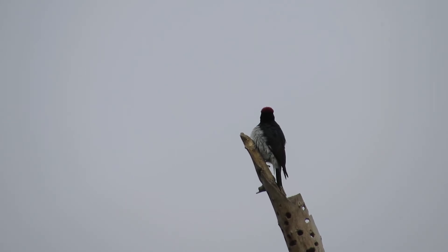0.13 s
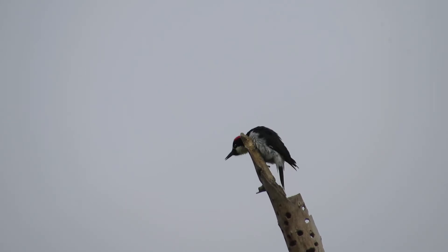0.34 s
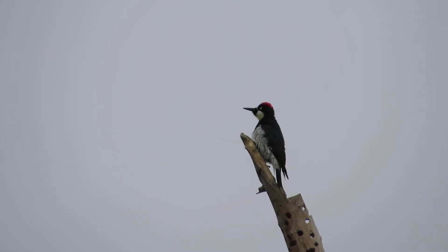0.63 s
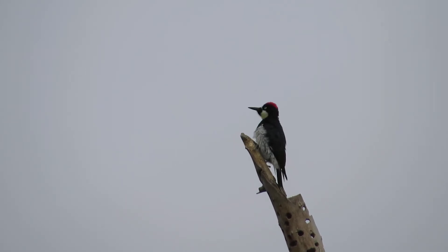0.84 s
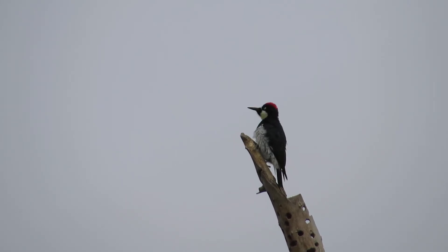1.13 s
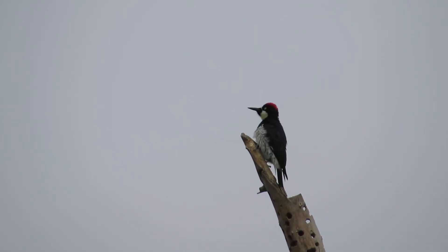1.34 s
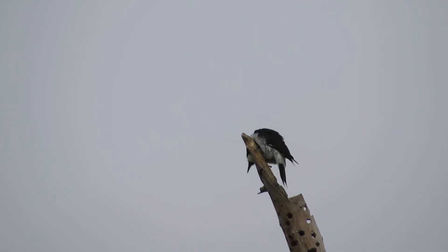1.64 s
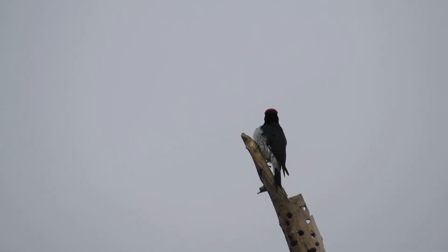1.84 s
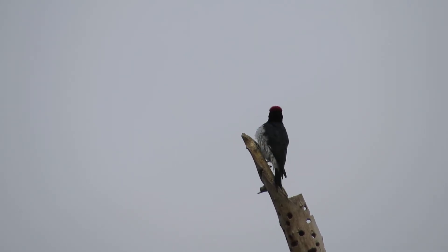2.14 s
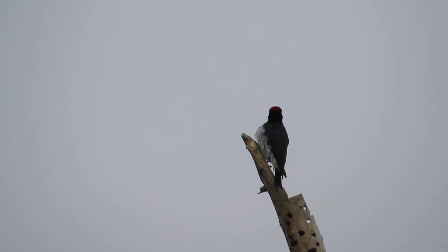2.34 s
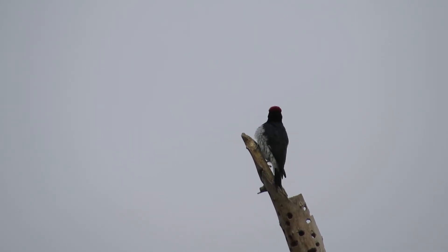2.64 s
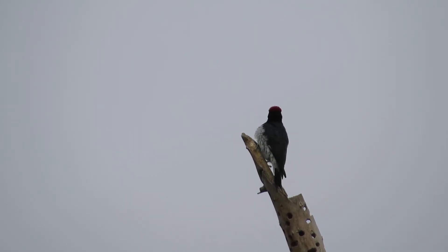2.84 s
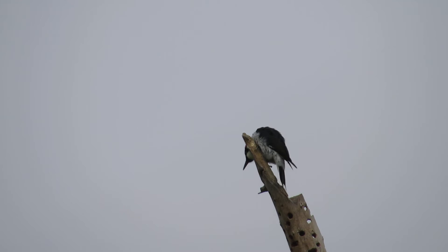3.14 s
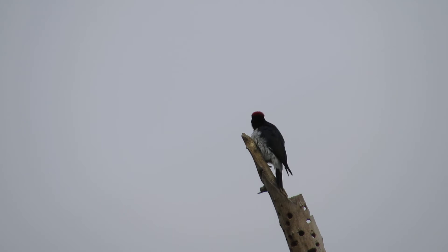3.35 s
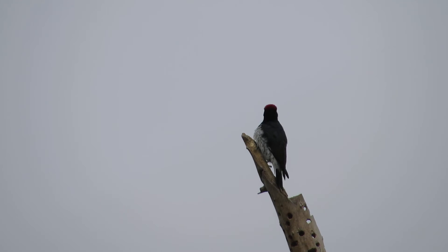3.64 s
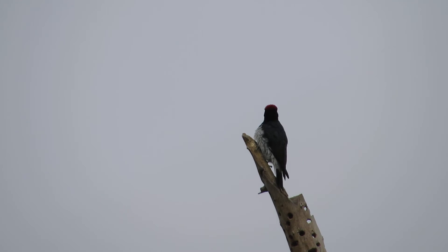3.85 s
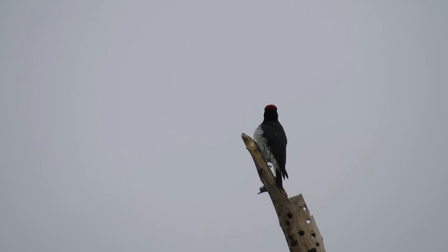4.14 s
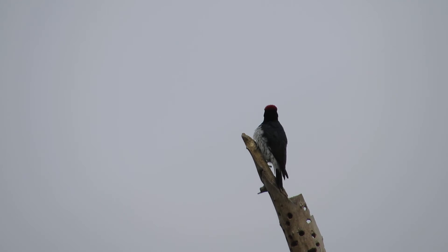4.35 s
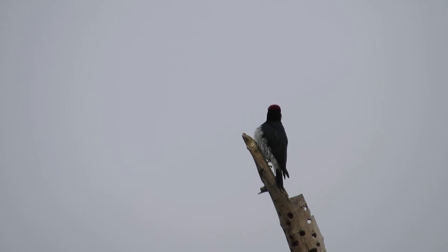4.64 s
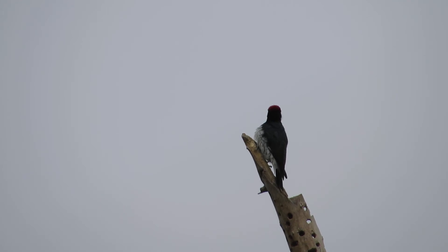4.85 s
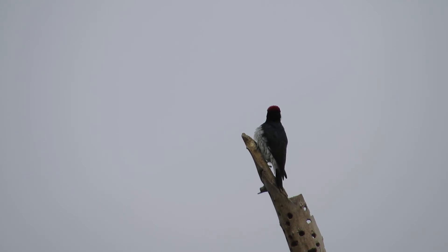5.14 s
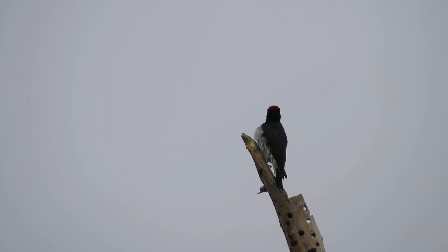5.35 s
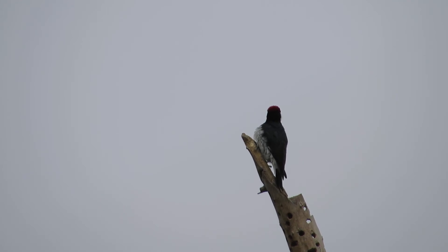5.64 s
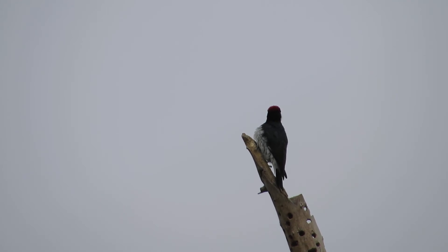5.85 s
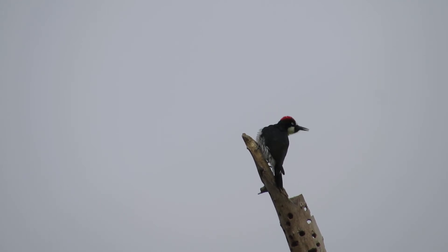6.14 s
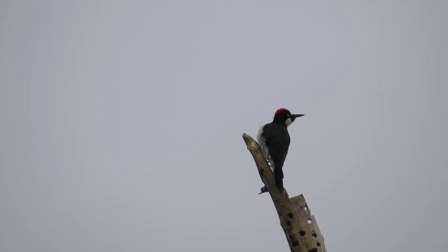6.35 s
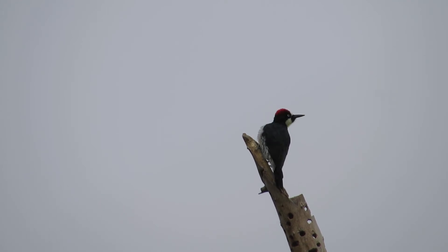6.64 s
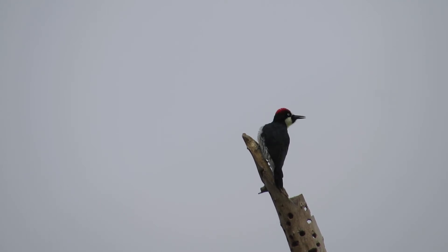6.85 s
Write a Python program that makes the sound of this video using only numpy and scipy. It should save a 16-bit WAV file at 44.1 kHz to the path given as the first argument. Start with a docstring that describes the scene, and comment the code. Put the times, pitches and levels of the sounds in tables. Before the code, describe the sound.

A woodpecker gives repeated rolling, raspy calls outdoors, early ones answered by shorter softer notes, over faint low rumble and distant thin bird whistles.

```python
"""Outdoors among trees, an acorn woodpecker on a dead branch gives six rolling calls,
the first three followed by a short, softer one. Each call is a run of pitch arches, about 36 a second,
shaped by throat and beak; most of the long calls turn raspy where they are highest.
A small bird further off whistles swept notes, an unsteady tone whines in the distance,
and filtered noise makes a low outdoor rumble and a soft hiss under it all."""
import sys
import numpy as np
from scipy import signal
from scipy.fft import rfft, irfft
from scipy.io import wavfile
from scipy.ndimage import uniform_filter1d

SR = 44100
rng = np.random.default_rng(int(sys.argv[2]) if len(sys.argv) > 2 else 0)


def dump_mix(stems):
    """Bounce the given channels to the path in sys.argv[1] as a 16-bit WAV at rate SR."""
    frames = np.atleast_2d(stems).T  # one column per channel
    limited = np.clip(frames, -1, 1)  # hard clip at full scale
    pcm = np.round(limited * 32767).astype(np.int16)
    wavfile.write(sys.argv[1], SR, pcm)


N = 308259
TIME = np.arange(N) / SR  # s
FREQS = np.fft.rfftfreq(N, 1 / SR) + 1e-3  # Hz, kept above zero so that a logarithm works
SYLLABLE_S = 0.028  # approximate spacing of the woodpecker's syllables

# resonances of the woodpecker's throat and beak, from low to high; the lowest three move with the call's pitch:
# [f/Hz, width/Hz, gain with the beak shut/dB, change with the beak wide open/dB, share of the weakening]
THROAT_RESONANCES = [(1890, 290, -27.5, -2, .3), (2620, 700, -23, -7, 1.7), (3385, 850, -34, 11, 1.43),
                     (4790, 2570, -44.5, 12.5, 0.82), (5860, 250, -33, -13.5, .6),
                     (11100, 2500, -54.5, 19, .3)]


def undb(db):
    """Turn decibels into a gain."""
    return 10 ** (np.asarray(db) / 20)


def unit(x):
    """Scale to an rms of 1."""
    return x / np.sqrt(np.mean(x ** 2))


def resonate(x, hz, width):
    """Ring at one pitch; the resonance is applied twice, for steep skirts."""
    b, a = signal.iirpeak(hz, hz / width, fs=SR)
    once = signal.lfilter(b, a, x)
    return signal.lfilter(b, a, once)


def band(hz, width):
    """Noise around one pitch, rms 1."""
    return unit(resonate(rng.standard_normal(N), hz, width))


def walk(hz):
    """Smooth random movement, up to about hz times a second, rms 1."""
    spectrum = rfft(rng.standard_normal(N))
    return unit(irfft(spectrum / (1 + (FREQS / hz) ** 4), N))


def air(flicker_db=1.0, left_db=0.1):
    """Rumble and hiss from shaped noise; the low part breathes a little and swells now and then."""
    # loudness of rumble and hiss along the pitch range, before the breathing:
    # [f/Hz, part alike at both ears/dB per Hz, part opposed between the ears/dB per Hz]
    noise_curve = [(20.1, -78, -83.5), (47.7, -72, -73.5), (92, -67, -70), (133.7, -72, -74),
                   (200, -79, -71), (540, -84.5, -76), (853, -83.5, -79.5), (1185, -86.5, -85),
                   (2000, -91.5, -89.5), (3020, -93.5, -93), (6930, -99.5, -98.5), (9900, -103, -102.5),
                   (12650, -107, -108), (13550, -117, -117)]
    # narrow humps on that curve: [f/Hz, width/Hz, lift of the alike part/dB, lift of the opposed part/dB]
    curve_humps = [(553, 25, 4, 3.5), (736, 20, 6.5, 8.5), (984, 84, 6, 3.5), (7830, 1600, 3, 0.5),
                   (13170, 700, 8, 5)]
    # swells of low rumble: [t of the peak/s, time to rise or fade/s, f/Hz, width of each filter pass/Hz,
    # level at the peak/dB]
    rumble_swells = [(6.088, 0.068, 28.6, 27.5, -37), (6.2, 0.6, 80.6, 93.8, -45.5),
                     (6.26, 0.4, 323, 115.6, -52), (6.749, 0.33, 356.3, 150.8, -56.5)]
    curve_hz, *curve_levels = np.transpose(noise_curve)
    parts = []
    for way, level_db in enumerate(curve_levels):
        db = np.interp(np.log(FREQS), np.log(curve_hz), level_db)
        for hz, width, *lift in curve_humps:
            db = db + lift[way] * 2 ** -((2 * (FREQS - hz) / width) ** 2)
        noise = rfft(rng.standard_normal(N)) * undb(db) * np.sqrt(SR / 2)
        low_share = 1 / (1 + (FREQS / 1200) ** 4)
        rumble = irfft(noise * low_share, N) * undb(flicker_db * walk(4.1))
        hiss = irfft(noise * (1 - low_share), N)
        parts.append(rumble + hiss)
    alike, opposed = parts
    out = np.array([alike + opposed, alike - opposed])
    for s, length, hz, width, db in rumble_swells:
        rise_and_fall = np.exp(-((TIME - s) / length) ** 2)
        # separate noise for each ear
        out = out + undb(db) * rise_and_fall * np.array([band(hz, width), band(hz, width)])
    return out * undb(np.array([[left_db], [-left_db]]) / 2)


def sizzle(hz=8340, drift_hz=70, spread_hz=150, db=-71):
    """A narrow band of high hiss whose pitch wanders slowly, the same at both ears."""
    phase = 2 * np.pi * np.cumsum(hz + drift_hz * walk(1.4)) / SR
    return undb(db) * unit(walk(spread_hz) * np.sin(phase) + walk(spread_hz) * np.cos(phase))


def whine(waver_hz=7, flutter_db=2, fade_s=0.12):
    """A thin tone from far away that comes and goes; its pitch and loudness waver at random."""
    # stretches of whine: [start t/s, end t/s, middle f/Hz, level before the flutter/dB]
    whine_stretches = [(0, 1.5, 1439, -58.5), (2.05, 4.27, 1442, -59.5), (5.8, 6.4, 1456, -61.5)]
    out = 0
    waver = waver_hz * walk(23.0)
    for start, end, hz, db in whine_stretches:
        fade = np.clip(np.minimum(TIME - start, end - TIME) / fade_s, 0, 1)
        phase = 2 * np.pi * np.cumsum(hz + waver) / SR
        ear_shift = np.array([[.8], [0]])  # radians, left and right
        out = out + undb(db) * np.sqrt(2 * fade) * np.sin(phase + ear_shift)
    return out * undb(flutter_db * walk(27))


def syllables(wind_up=0.04, crest_power=2.2, opening_power=1.2, full_voice_hz=850, soft_db_per_hz=0.01,
              rasp_from_hz=870, rasp_full_hz=987, calm_rough=0.15, edge_rough=0.12):
    """Each call climbs to its highest pitch and sinks again while the beak opens; strength and rasp follow pitch.
    Rows: (t/s, top f/Hz, roughness, gain of each resonance/dB)."""
    # woodpecker calls: [t of first syllable/s, t of last syllable/s, first f/Hz, highest f/Hz, last f/Hz,
    # added rasp 0-1, relative level/dB, extra on the first syllable/dB, beak opening at the start 0-1,
    # brightness/dB, hiss of the top resonance/dB]
    calls = [(0.269, 0.467, 718, 993, 748, 0.25, -0.5, -2.5, 0.06, 0, 3),
             (0.636, 0.688, 630, 824.4, 763, .05, 0, -5.5, .8, -2, 0.5),
             (1.566, 1.738, 734, 999.3, 844, 0.32, -2, -1, 0, -2, 1.5),
             (1.9, 1.987, 620, 793, 645, .05, -1.5, -3, 0.66, -1, -8),
             (3.067, 3.271, 723, 1004, 791, 0.4, -1.5, -2.5, 0, -0.5, 3),
             (3.434, 3.521, 620, 786, 634, .05, -1.5, -5.5, 0.7, -0.5, -1),
             (4.57, 4.75, 700, 951, 791.5, 0.03, 1, -2.5, 0.09, 1, -12),
             (6.021, 6.221, 700, 989, 660, 0.31, -0.5, -2.5, 0.12, 1, 3.5),
             (6.848, 7.058, 660, 883, 699, 0, 2, -3, 0.43, 1.5, -0.5)]
    rows = []
    shut_db, open_db, weakening = np.transpose(THROAT_RESONANCES)[2:]
    for first, last, first_hz, high_hz, last_hz, rasp, db, first_db, ajar, bright_db, hiss_db in calls:
        length = last - first
        wait = wind_up * length  # extra pause after the first syllable
        times = np.linspace(first + wait, last, round((length - wait) / SYLLABLE_S) + 1)
        colour_db = np.array([-bright_db, 0, bright_db, hiss_db / 4, 0, hiss_db])
        for s in [first, *times[1:]]:
            progress = (s - first) / length
            edge_hz = first_hz if progress < .5 else last_hz
            # a higher power keeps the pitch flatter in the middle of a call
            hz = high_hz - (high_hz - edge_hz) * abs(2 * progress - 1) ** crest_power
            rough = calm_rough + rasp * np.interp(hz, [rasp_from_hz, rasp_full_hz], [0, 1])
            rough += edge_rough * (s in (first, last))  # slack first and last syllables
            # the beak opens slowly at first
            opening = ajar + (1 - ajar) * progress ** opening_power
            # below full_voice_hz the voice weakens
            soft_db = weakening * soft_db_per_hz * max(full_voice_hz - hz, 0)
            strength_db = db + first_db * (s == first) - soft_db
            rows.append((s, hz, rough, *(strength_db + colour_db + shut_db + open_db * opening)))
    return rows


def syrinx(pitch, rough, slope=1.0):
    """Membrane tone with 14 harmonics; when forced, its cycles turn uneven and alternate strong and weak."""
    uneven_pitch = pitch * (1 + .055 * rough * walk(500))
    phase = 2 * np.pi * np.cumsum(uneven_pitch) / SR
    tone = unit(sum(np.sin(k * phase) / k ** slope for k in np.arange(1, 15)))
    # half the pitch makes every other cycle stronger
    return tone * (1 + rough * (.7 * np.cos(phase / 2) + .45 * walk(500)))


def woodpecker(half_s=0.016, dip=.21, arch_power=1.15, lean=.1, sag=0.5, linked=0.58, fade_s=0.003, hold=1.01,
               fundamental_db=-26, breath=0.019, tracking=0.11, patchy_db=5, stagger=0.03443, top_air=.11):
    """Every syllable is one arch of pitch and loudness, coloured by throat and beak."""
    # narrow gaps between the resonances: [f/Hz, width/Hz, depth 0-1]
    throat_gaps = [(2120, 180, 0.14), (2820, 220, 0.27)]
    rows = syllables()
    times, tops, roughs = np.transpose(rows)[:3]
    centres = times - lean * half_s
    # the nearest syllable, looked up every 16 samples
    nearest = np.argmin(abs(TIME[::16, None] - centres), axis=1).repeat(16)[:N]
    place = np.clip((TIME - centres[nearest]) / half_s, -1, 1)

    # 0 at the top of an arch, towards 1 at its edges; the arch climbs slowly and falls fast
    slack = abs(np.sin(np.pi / 2 * (place - lean * (1 - place ** 2)))) ** (2 * arch_power)
    syllable_rough = np.clip(roughs[nearest], 0, 1)
    rasp = uniform_filter1d(syllable_rough, size=300)
    arches = uniform_filter1d(tops[nearest] * (1 - dip * slack), size=90)
    pitch = arches * (1 + stagger * rasp * walk(59.2))
    # the tone breaks up on the way to the top of an arch and clears partly as it falls
    rough = syllable_rough * (1.25 - slack) * np.interp(place, [.1, .6], [1, .45])

    # soft, low syllables stand apart; high ones run together
    effort = np.clip((np.interp(TIME, times, tops) - 800) / 150, 0, 1)
    swell = 1 - sag * (1 - linked * effort) * slack
    tone = syrinx(pitch, rough)
    air_flow = rng.standard_normal(N)
    voice = (tone + breath * air_flow) * swell
    # forced syllables turn noisy in the second and third resonance
    bright = voice + 1.7 * rough * swell * rng.standard_normal(N)
    # the top three resonances carry more air
    airy = (tone + top_air * air_flow) * swell
    # in a rasp the strength jumps about between the lowest three resonances
    sources = [source * undb(patchy_db * rasp * walk(37)) for source in (voice, bright, bright)]
    sources += [airy, airy, airy, voice]

    out = np.zeros(N)
    # a syllable lasts until the next one of its call
    waits = np.diff(times, append=np.inf)
    reaches = hold * np.where(waits < 2 * SYLLABLE_S, waits, SYLLABLE_S) / 2
    for centre, reach, (_, top, _, *levels) in zip(centres, reaches, rows):
        span = slice(int((centre - 2 * half_s) * SR), int((centre + 2 * half_s) * SR))
        gate = np.clip((reach - abs(TIME[span] - centre)) / fade_s + .5, 0, 1)
        # the throat tightens with pitch
        tighten = (top / 900) ** tracking
        throat = [(hz * tighten, width) for hz, width, *_ in THROAT_RESONANCES[:3]]
        throat += [(hz, width) for hz, width, *_ in THROAT_RESONANCES[3:]]
        # the fundamental barely gets out
        throat.append((top, top / 2))
        levels.append(levels[0] + fundamental_db)
        for source, (hz, width), db in zip(sources, throat, levels):
            out[span] += undb(db) * resonate(source[span], hz, width) * gate
    for hz, width, depth in throat_gaps:
        b, a = signal.iirpeak(hz, hz / width, fs=SR)
        out = out - depth * signal.lfilter(b, a, out)
    return out


def trees(x, t60, wet_db, delay_s=0.018):
    """Scatter from trunks and ground: a fading noise echo, different at each ear, down 60 dB after t60 seconds."""
    t = TIME[:SR // 2]
    tail = rng.standard_normal((2, len(t))) * undb(-60 * t / t60) * (t > delay_s)
    tail = tail / np.sqrt(np.sum(tail ** 2, axis=1, keepdims=True))
    return undb(wet_db) * signal.fftconvolve(x[None], tail, axes=1)[:, :N]


def small_bird(bend=1.1, whistle_end_hz=4410, slur_end_hz=3470, slur_db=-60):
    """Thin, unsteady whistles that fall faster and faster, some with a soft slur after; lone notes sound as well."""
    # song of falling whistles: [t/s, length/s, start f/Hz, level before the flutter/dB, length of the slur/s]
    song = [(3.345, 0.065, 6830, -58, 0), (3.502, 0.057, 7960, -55, 0.0005), (3.629, 0.076, 8830, -55, 0),
            (3.769, 0.074, 8230, -55, 0), (3.925, 0.035, 9200, -55.5, 0.03),
            (4.058, 0.04, 9250, -55.5, 0.032), (4.208, 0.03, 9300, -53.5, 0.053)]
    # lone notes of other birds: [t/s, length/s, start f/Hz, end f/Hz, level before the flutter/dB]
    lone_notes = [(2.162, 0.059, 2490, 2560, -63), (2.969, 0.045, 3380, 3425, -64),
                  (5.56, 0.02, 5470, 5200, -59)]
    whistles = [(s, length, hz, whistle_end_hz, db) for s, length, hz, db, _ in song]
    slurs = [(s + length, slur, whistle_end_hz, slur_end_hz, slur_db)
             for s, length, _, _, slur in song if slur > 0]
    out = np.zeros(N)
    wobble = 1 + .022 * walk(200)
    flutter = undb(3 * walk(140))
    for s, length, start_hz, end_hz, db in whistles + slurs + lone_notes:
        span = slice(int(s * SR), int((s + length) * SR))
        progress = np.clip((TIME[span] - s) / length, 0, 1) ** bend
        hz = (start_hz + (end_hz - start_hz) * progress) * wobble[span]
        swell = np.sqrt(abs(np.sin(np.pi * progress)))
        out[span] += np.sqrt(2) * undb(db) * swell * np.sin(2 * np.pi * np.cumsum(hz) / SR)
    return out * flutter


def scene(pan_db=-0.9, call_db=-0.53):
    """Both birds sit almost straight ahead with scatter around them, over the whine, rumble and hiss."""
    calls = undb(call_db) * woodpecker()
    chips = small_bird()
    near_scatter = trees(calls, t60=0.13, wet_db=-12.5, delay_s=.01)
    far_scatter = trees(calls, t60=0.57, wet_db=-11.5) + trees(chips, t60=.25, wet_db=-7.0)
    direct = (calls + chips) * undb(np.array([[pan_db], [-pan_db]]) / 2)
    return direct + near_scatter + far_scatter + whine() + sizzle() + air()


def record(dry, top_hz=15000):
    """Filters cut narrow notches and, steeply, everything above top_hz."""
    # narrow notches: [f/Hz, width/Hz]
    narrow_cuts = [(3935, 260), (7870, 130)]
    for hz, width in narrow_cuts:
        b, a = signal.iirnotch(hz, hz / width, fs=SR)
        dry = signal.lfilter(b, a, dry)
    return signal.sosfilt(signal.ellip(8, .2, 70, top_hz, fs=SR, output="sos"), dry)


dry = scene()
out = record(dry)
dump_mix(out)
```